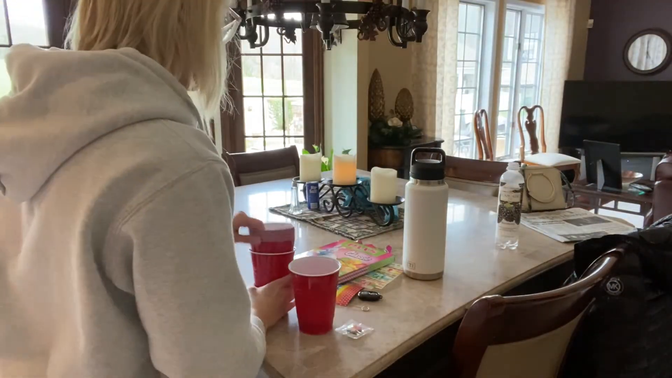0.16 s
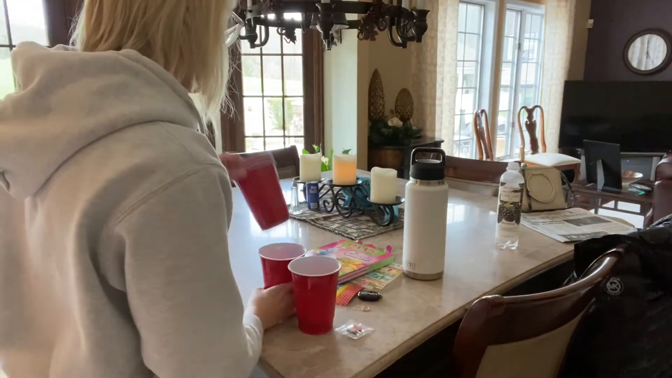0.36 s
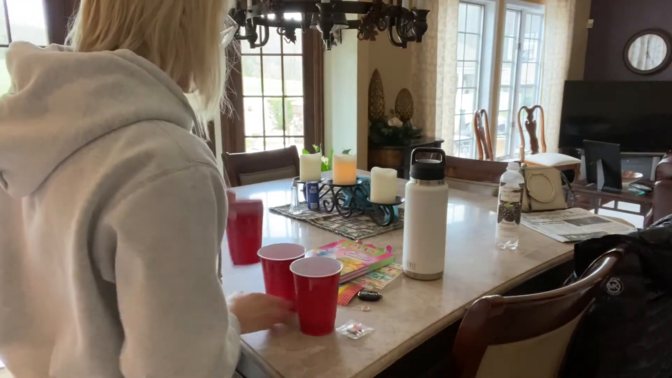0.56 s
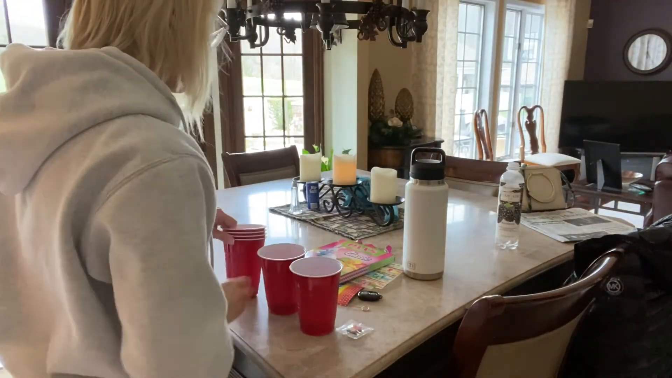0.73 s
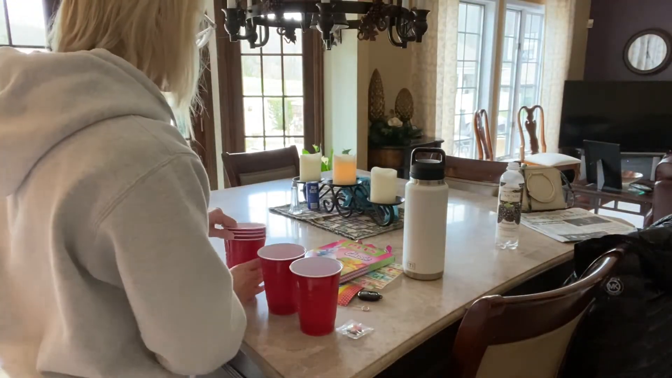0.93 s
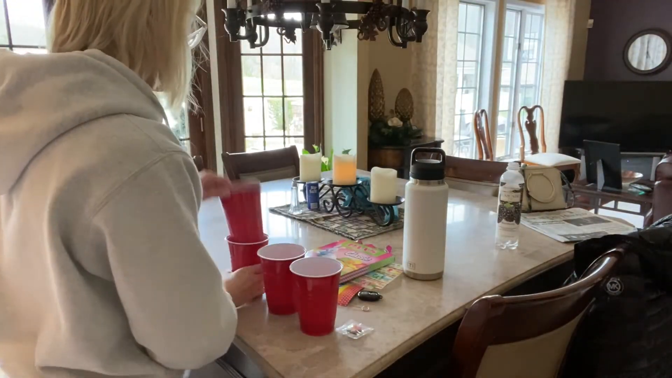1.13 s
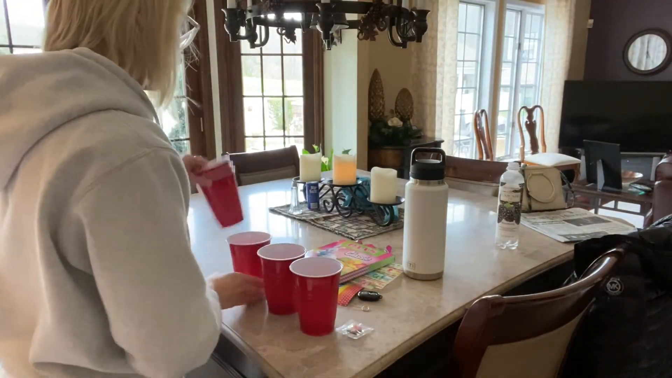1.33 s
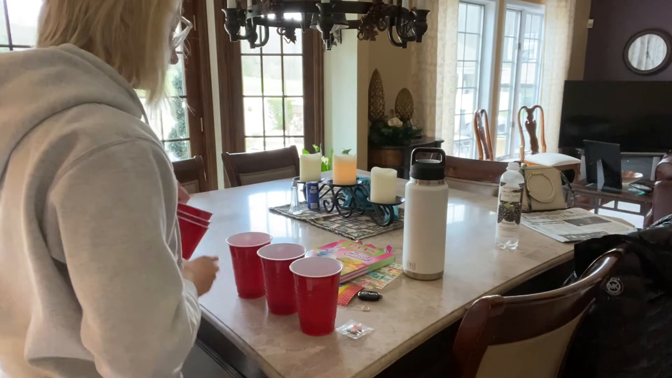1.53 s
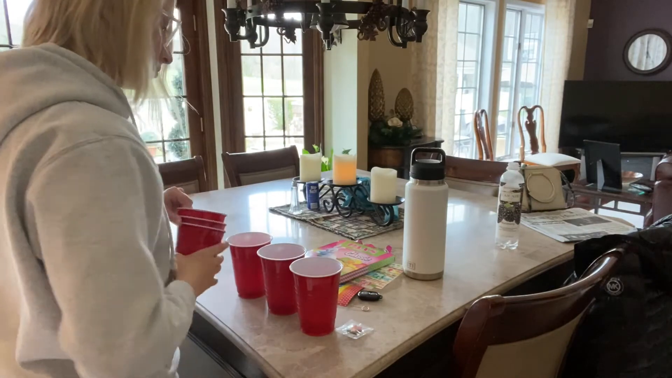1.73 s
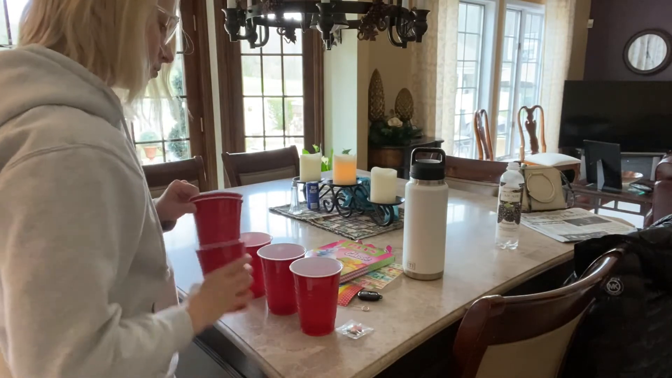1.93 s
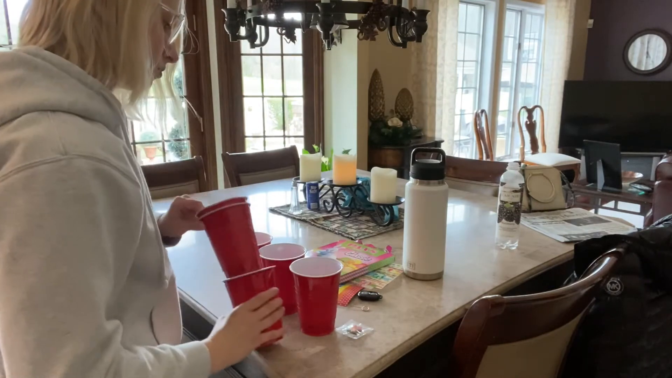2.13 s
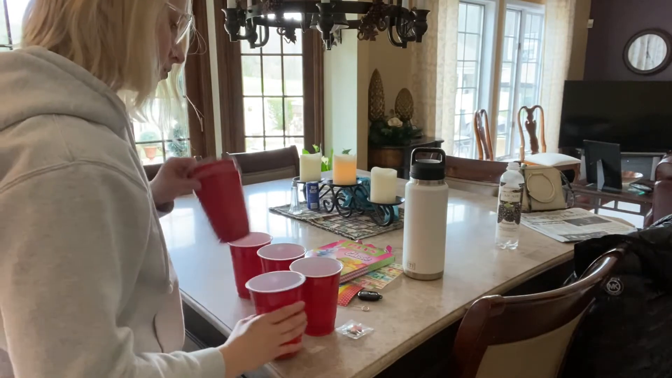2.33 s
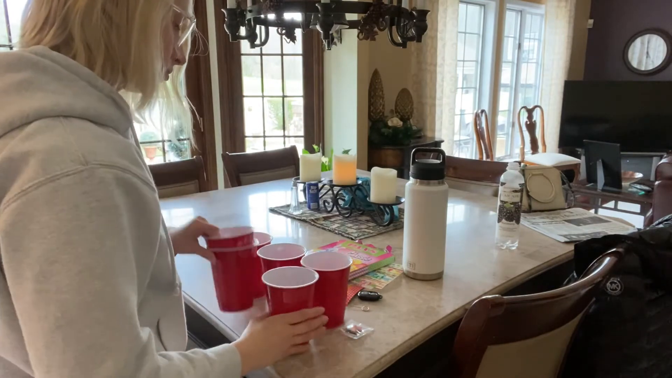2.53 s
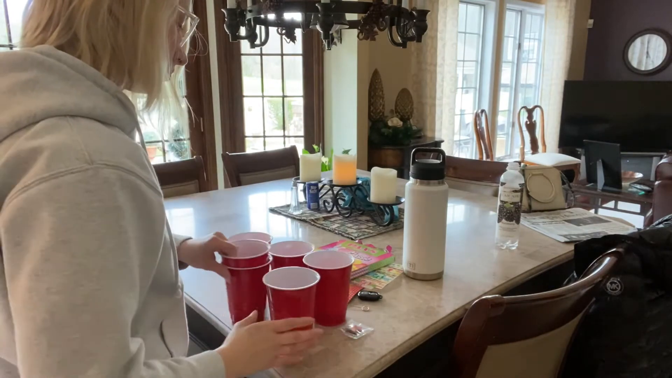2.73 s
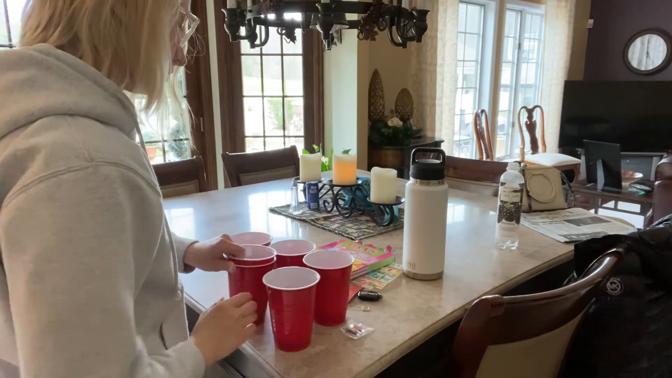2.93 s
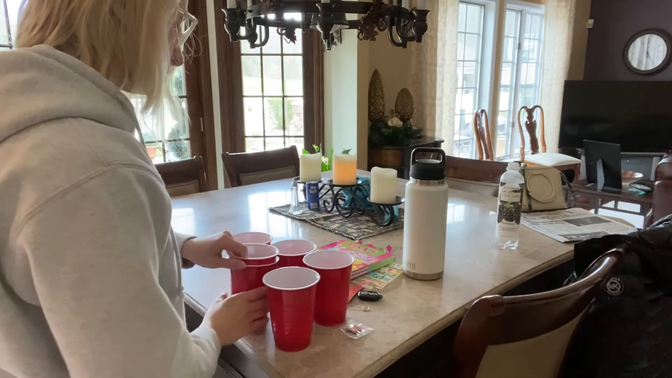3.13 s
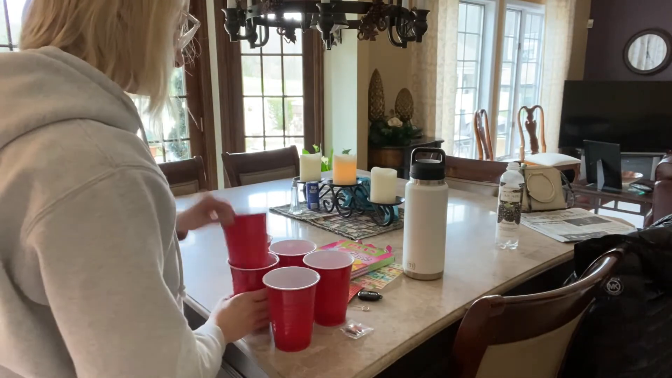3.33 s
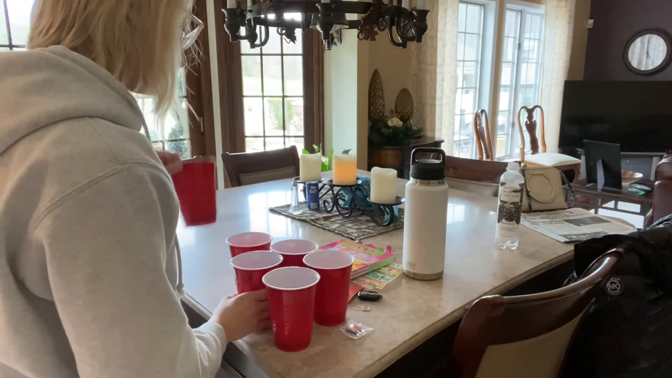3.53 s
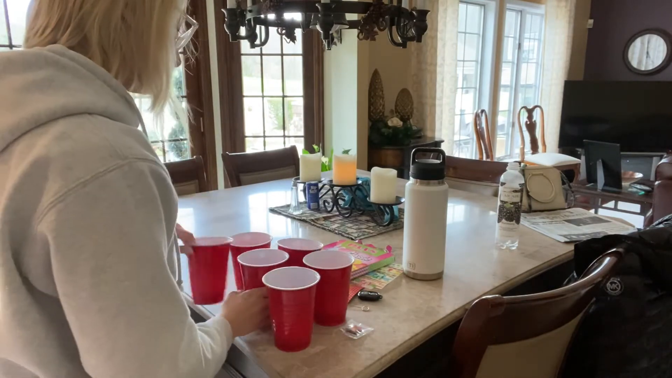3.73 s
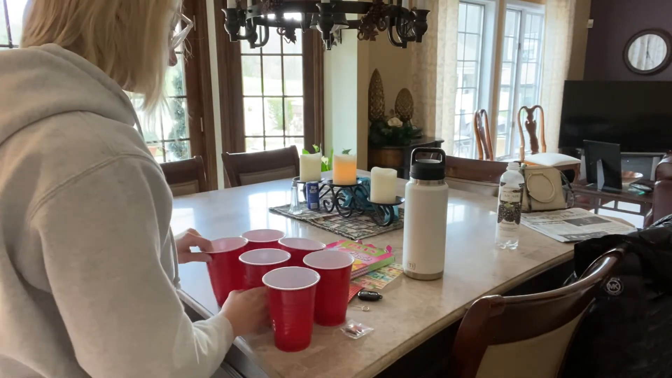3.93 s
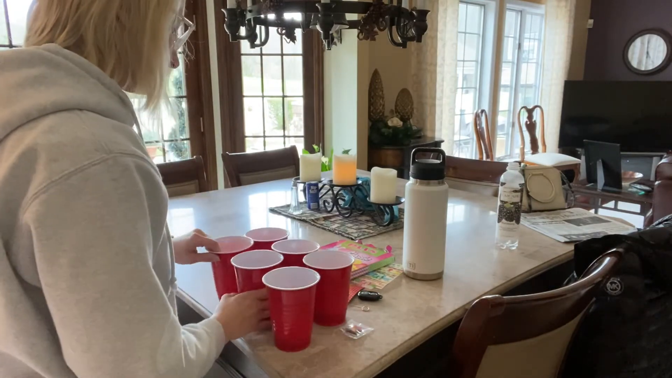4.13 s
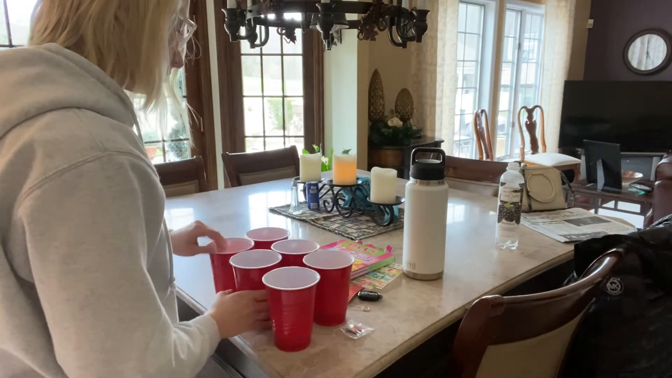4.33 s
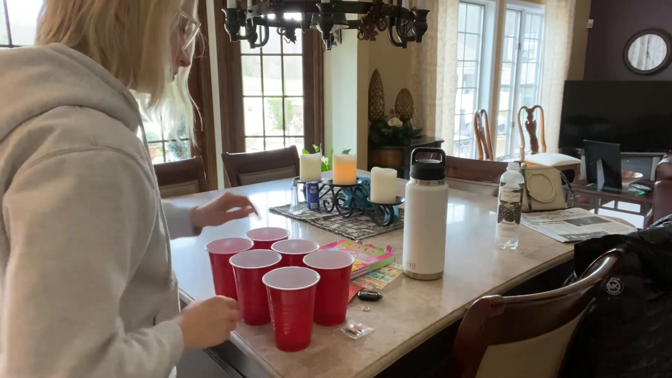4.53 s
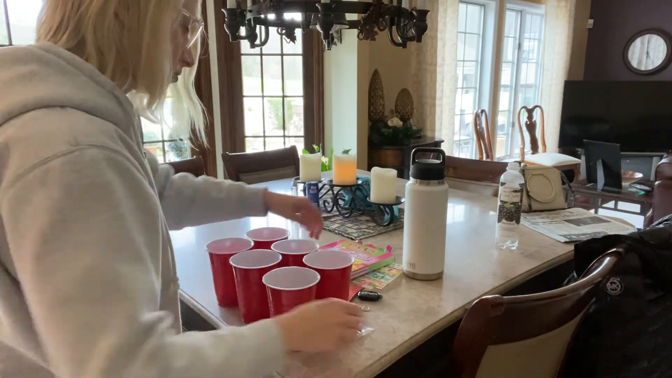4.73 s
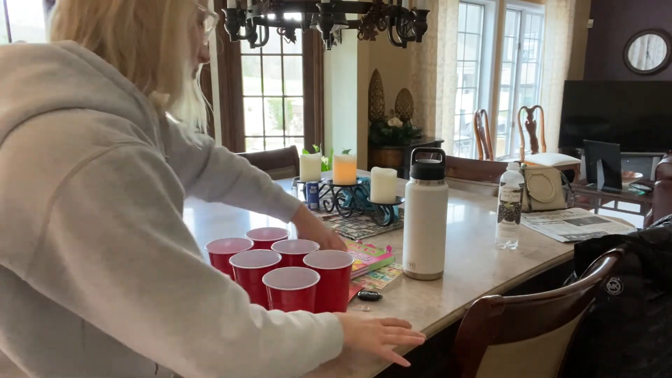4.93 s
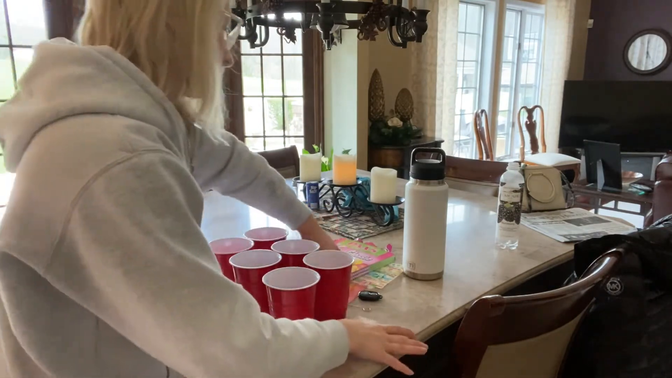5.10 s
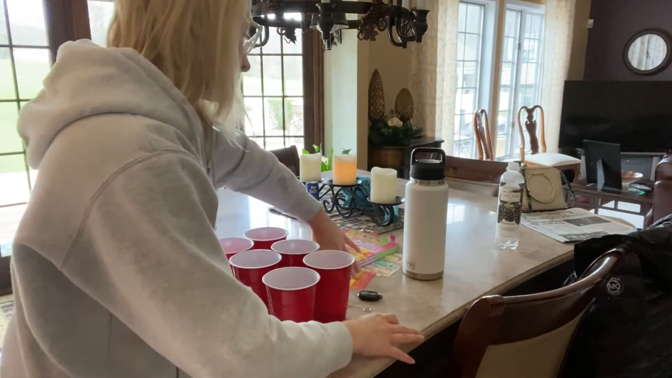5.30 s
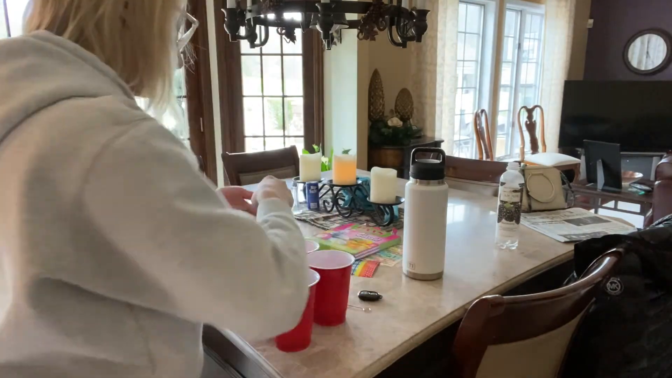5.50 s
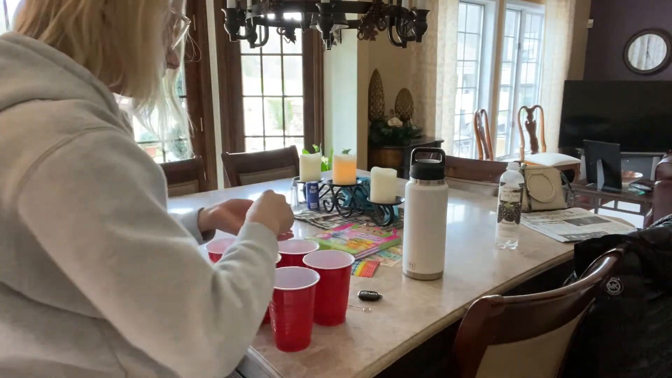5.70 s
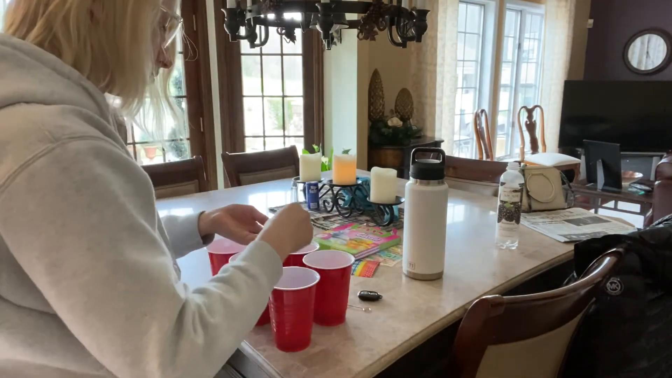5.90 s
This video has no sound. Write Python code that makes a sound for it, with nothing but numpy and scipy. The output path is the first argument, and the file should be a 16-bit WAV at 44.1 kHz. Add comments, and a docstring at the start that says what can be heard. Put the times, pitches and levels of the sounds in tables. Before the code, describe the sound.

Thin plastic cups are slid off a stack and knocked onto a stone counter with hollow pops, scrapes and rattles, then a palm sweep and click.

```python
"""Thin plastic cups on a stone counter

Thin plastic cups are pulled off a stack, set down and nudged together on a stone counter in a kitchen.
Each knock rings the air in the cup and its wall, as decaying sines and shaped noise bursts.
Sliding walls scrape: tiny random slips feed resonators, and narrow gliding notes hum along.
Later a palm sweeps over the stone as shaped slips, and something small clicks down as bursts of noise.
The room answers the knocks with fading noise bands, over a very quiet floor of hiss and dull rumbles.
"""
import sys
import numpy as np
from scipy import signal
from scipy.fft import rfft, irfft
from scipy.io import wavfile
from scipy.ndimage import uniform_filter1d

SR = 44100
rng = np.random.default_rng(int(sys.argv[2]) if len(sys.argv) > 2 else 0)


def wrap_up_sound(samples):
    """Save the sound to the file named by the first command line argument, as 16-bit audio."""
    columns = np.atleast_2d(samples).T
    # keep every value between -1 and 1, then stretch to whole-number steps
    tamed = np.clip(columns, -1, 1)
    steps = np.round(tamed * 32767).astype(np.int16)
    wavfile.write(sys.argv[1], SR, steps)


N = 262836
T = np.arange(N) / SR


def undb(db):
    """Turn decibels into a gain."""
    return 10 ** (np.asarray(db) / 20)


def unit(x):
    """Scale to an rms of 1."""
    return x / np.sqrt(np.mean(x ** 2))


def peak_unit(x):
    """Scale to a peak of 1."""
    return x / np.max(np.abs(x))


def onset_unit(x):
    """Scale to an rms of 1 over the first 20 ms."""
    return x / np.sqrt(np.mean(x[..., :SR // 50] ** 2))


def along(table, size):
    """Read a (pitch_hz, value) table at the bins of a transform, on a log pitch scale."""
    hz, value = np.transpose(table)[:2]
    bins_hz = np.arange(size // 2 + 1) * SR / size
    return np.interp(np.log(bins_hz + 1), np.log(hz), value)


def colour(x, table):
    """Shape the spectrum with (pitch_hz, level_db) points."""
    size = x.shape[-1]
    return irfft(rfft(x) * undb(along(table, size)), size)


def resonate(x, hz, width_hz):
    """Let one damped resonance answer a signal."""
    return signal.lfilter(*signal.iirpeak(hz, hz / width_hz, fs=SR), x)


def ring(t, hz, t60_s, rise_s):
    """Sound one struck mode: a sine with a soft start and an exponential decay."""
    decay = np.exp(-np.log(1000) * t / t60_s)
    return np.sin(2 * np.pi * hz * t) * decay * (1 - np.exp(-t / rise_s))


def curve(table):
    """Draw gains over time from the dB columns of a table; inaudible outside it."""
    s, *columns_db = np.transpose(table)
    return [undb(np.interp(T, s, db, left=-140, right=-140)) for db in columns_db]


def uneven(hold, smooth):
    """Draw a slow random curve: values held for some samples, then smoothed over others."""
    steps = np.repeat(rng.standard_normal(N // hold + 1), hold)
    return uniform_filter1d(steps, smooth)[:N]


def slips(rate_hz, spread_db):
    """Scatter stick-slip clicks of random height, sparse enough to be single samples."""
    when = rng.random((2, N)) < rate_hz / SR
    height = rng.standard_normal((2, N))
    boost_db = spread_db * np.minimum(rng.exponential(size=(2, N)), 4)
    return when * height * undb(boost_db)


# How alike left and right sound: pitch_hz, likeness (0-1)
STEREO_LIKENESS = [(30, .85), (60, .85), (130, .78), (300, .5), (600, .05), (1200, .3), (2500, .25),
                   (5000, .65), (8500, .85), (15000, .8)]


def wide(x):
    """Spread two unrelated signals into left and right, as alike as the table says at each pitch."""
    size = x.shape[-1]
    like = np.clip(along(STEREO_LIKENESS, size), 0, .99)
    mid = rfft(x[0]) * np.sqrt((1 + like) / 2)
    side = rfft(x[1]) * np.sqrt((1 - like) / 2)
    return irfft(np.array([mid + side, mid - side]), size)


# Spectrum of the quiet room hiss: pitch_hz, level_db (per Hz)
FLOOR_COLOUR = [(15, -35), (25, -18.5), (54, -10), (130, -4.5), (200, -23), (305, -18.5), (470, -17),
                (1000, -20.5), (2000, -24), (4500, -30), (8500, -27.5), (13000, -28.5), (14200, -55)]
# Thuds through the stand and the counter: time_s, stand_db, counter_db
RUMBLE_LEVELS = [(0.0, -58, -58), (0.31, -67, -55.5), (0.7, -70, -72.5), (0.78, -73, -55.5),
                 (0.93, -67.5, -60.5), (1.94, -74, -68), (2.14, -72, -48.5), (2.42, -72, -70),
                 (2.71, -90, -53), (3.17, -91, -67.5), (3.39, -94, -52), (3.72, -92, -69.5),
                 (3.95, -63, -59.5), (4.4, -76, -65), (4.98, -91, -86), (5.12, -63, -64),
                 (5.25, -52.5, -67), (5.43, -75, -80.5), (5.88, -59.5, -66.5), (5.96, -75, -72.5)]
FLOOR_DB = -73.5


def floor():
    """Quiet hiss of the room, and dull low noise that swells and sinks while the hands work."""
    stand_gain, counter_gain = curve(RUMBLE_LEVELS)
    # shapes: (pitch_hz, level_db)
    stand_colour = [(15, -44.0), (30, -21.0), (55, 9), (80, -6.5), (150, -50.5)]
    counter_colour = [(50, -42.5), (90, -3), (165, -2.5), (220, -2.0), (320, -8.0), (600, -69.0)]
    stand = colour(rng.standard_normal((2, N)), stand_colour)
    counter = colour(rng.standard_normal((2, N)), counter_colour)
    hiss = colour(rng.standard_normal((2, N)), FLOOR_COLOUR)
    return wide(undb(FLOOR_DB) * unit(hiss) + stand_gain * unit(stand) + counter_gain * unit(counter))


# Cup walls and fingers sliding: time_s, hollow_db, wall_db, rasp_db
SCRAPE_LEVELS = [(0.0, -51, -101, -115), (0.12, -70, -68, -62.5), (0.27, -43, -57, -51),
                 (0.39, -46, -85, -62), (0.53, -69.5, -83, -68), (0.59, -85, -63, -58.5),
                 (0.68, -70, -88, -81), (0.755, -56.5, -65, -89), (0.8, -44.5, -74, -102),
                 (0.96, -55.5, -64, -57), (1.24, -52, -54, -70), (1.4, -55, -66, -102),
                 (1.6, -58.5, -60.5, -68), (1.82, -61, -68, -62.5), (1.88, -49.5, -56, -46.5),
                 (1.97, -48.5, -55, -50.5), (2.05, -45, -55.5, -55), (2.22, -48, -68, -77),
                 (2.43, -50, -83, -60.5), (2.66, -58, -42, -58), (2.88, -71, -53, -66),
                 (3.0, -57, -70, -72), (3.13, -55, -73, -66), (3.37, -46, -58.5, -46),
                 (3.56, -58, -76.5, -71), (3.65, -62, -75, -94), (3.77, -70, -81, -72),
                 (3.87, -44.5, -82, -66), (4.0, -42.5, -73, -80), (4.07, -45.5, -73, -69),
                 (4.25, -54.5, -69, -77), (4.37, -58, -61, -83), (4.42, -66.5, -96, -79),
                 (4.45, -87.5, -100, -96)]
# Air in the cups: pitch_hz, width_hz, level_db
HOLLOW_MODES = [(313, 90, -6.5), (394, 90, 8.5), (715, 47, 12.5)]
# Modes of the cup wall, also struck by knocks: pitch_hz, level_db, t60_s
WALL_MODES = [(1219, 1, 0.055), (1440, 5, 0.029), (1843, 13.5, 0.024), (2079, 7, 0.045), (2360, 3, 0.051),
              (2360, -7, 0.011), (3200, -7.5, 0.11), (5060, -11.5, 0.031)]
# Small high modes of the rim, also struck by knocks: pitch_hz, level_db, t60_s
RIM_PINGS = [(3062, -1.5, 0.048), (3580, -2.5, 0.039), (4450, 2.5, .03), (4880, 2.5, 0.036),
             (5300, 0, 0.039), (5720, -4.5, 0.033), (7430, -6.5, 0.033)]
# Hard bright crack, also in knocks: pitch_hz, level_db (per Hz)
TICK_COLOUR = [(700, -18.5), (1200, -13), (2500, -15.5), (3500, 7), (5000, 7.5), (6300, -8), (7500, -26),
               (9000, -30.5)]
# Highest crackle, also in knocks: pitch_hz, level_db (per Hz)
SIZZLE_COLOUR = [(5000, -28), (6500, -4), (7500, -5), (10000, -11), (13000, -8.5), (16000, -8.5)]


def scrape():
    """Slips of wall on wall, in uneven bunches, feed the air in the cups, the wall modes and a rasp."""
    hollow_gain, wall_gain, rasp_gain = curve(SCRAPE_LEVELS)
    grip_db = 1.5 * uneven(300, 150)
    x = slips(4000, 0.71) * undb(grip_db)
    air = sum(undb(db) * resonate(x, hz, width) for hz, width, db in HOLLOW_MODES)
    # a shorter t60 makes a wider resonance
    wall = sum(undb(db) * resonate(x, hz, 9.8 / t60) for hz, db, t60 in WALL_MODES)
    rim = sum(undb(db) * resonate(x, hz, 5.1 / t60) for hz, db, t60 in RIM_PINGS)
    rasp = unit(colour(x, TICK_COLOUR)) + .6 * unit(rim) + 1.8 * unit(colour(x, SIZZLE_COLOUR))
    return wide(hollow_gain * unit(air) + wall_gain * unit(wall) + rasp_gain * unit(rasp))


# Knocks: start_s, air_peak_db, air_hz, thud_db, wall_hz, wall_db, tick_db, sizzle_db,
# left_minus_right_db, rattle_db (against the blow), air_swell_s
KNOCK_LIST = [(0.015, -42, 343, -47.5, 1540, -93, -91, -79, 0, -11, 0.0047),
              (0.101, -76, 294, -51.5, 1590, -72.5, -70, -58, -3, 5.5, 0.0031),
              (0.128, -81, 293, -80, 1930, -73, -65, -58.5, 0, -23, 0.0035),
              (0.179, -56, 400, -69, 1600, -72, -68.5, -62, -2, 10.5, 0.0031),
              (0.204, -15, 416, -35.5, 1470, -46, -55, -54, -2.5, -8.5, 0.0025),
              (0.251, -29.5, 381, -39, 1400, -55, -64, -70, -4, 0.5, 0.0056),
              (0.287, -35.5, 412, -50, 2280, -45.5, -50, -50, -2, -24, 0.009),
              (0.318, -31, 614, -62, 2570, -83, -55, -56, -2, -10, 0.0057),
              (0.361, -48, 402, -65, 1480, -49.5, -57, -48.5, 2, -23, 0.0027),
              (0.368, -43.5, 297, -56, 2090, -41, -45, -62, -4.5, -25, 0.012),
              (0.447, -45, 362, -72, 1950, -51.5, -70, -61, -2, -20, 0.0033),
              (0.546, -57, 460, -79, 1717, -57.5, -74, -68, -2, 2.5, 0.003),
              (0.577, -61, 310, -82, 1580, -60, -62.5, -73, 0, -12, 0.0044),
              (0.767, -22, 446, -34.5, 1790, -46, -49, -55, -2, -7.5, 0.0034),
              (0.934, -61.5, 325, -71, 1730, -76, -72, -72, 7, -22, 0.0052),
              (1.016, -47, 444, -76, 1900, -68, -65, -51, -2, 11, 0.003),
              (1.046, -31, 437, -55, 1160, -35.5, -51, -48, 0, -3, 0.0075),
              (1.059, -30.5, 475, -56, 1645, -34, -46, -56, -3, -23, 0.0079),
              (1.077, -25, 426, -73, 1500, -44, -59, -58, -4, -1.5, 0.0032),
              (1.111, -32, 490, -68, 1440, -59, -52, -51.5, 0.5, -3.5, 0.007),
              (1.173, -31, 452, -64, 1465, -39.5, -60, -88, -2, -18, 0.004),
              (1.211, -25.5, 817, -57, 1770, -32, -42.5, -62, -1, -22, 0.0055),
              (1.243, -30.5, 618, -69, 1810, -52.5, -54, -73, -1, -13.5, 0.0022),
              (1.317, -42, 700, -70.5, 2080, -63, -67, -79, 4, -13.5, 0.0056),
              (1.343, -41.5, 660, -67, 2070, -64.5, -73, -77.5, 9, -16, 0.0045),
              (1.422, -38.5, 635, -65.5, 2090, -56.5, -66, -76, 2, -7.5, 0.0039),
              (1.487, -43, 680, -65, 2140, -58, -60, -63, 0, -3, 0.003),
              (1.509, -42, 358, -55.5, 1640, -58, -64.5, -54, -1, -5, 0.0033),
              (1.565, -53, 693, -66, 2120, -73.5, -71, -68, -1, -20, 0.0034),
              (1.612, -53, 626, -66, 2140, -56.5, -61, -79, 1, -10, 0.00096),
              (1.641, -56.5, 780, -63.5, 2060, -61, -62.5, -51.5, -1, -3, 0.012),
              (1.776, -54, 703, -76, 1450, -63, -72, -68, -3, -13, 0.0092),
              (1.79, -58, 756, -72.5, 2370, -66, -66, -66, -5, -15, 0.0044),
              (1.857, -42.5, 413, -60.5, 1840, -58.5, -63.5, -59, -3, 3, 0.0025),
              (1.896, -36.5, 769, -61.5, 1914, -44, -55, -58.5, -1.5, -9, 0.009),
              (1.949, -49.5, 706, -68.5, 2170, -54, -54.5, -67, 0, -11, 0.0013),
              (2.01, -38, 554, -59.5, 1730, -58, -48, -60, 4, -14, 0.0059),
              (2.029, -39.5, 533, -55.5, 1800, -50, -45.5, -44.5, -2.5, -12, 0.0058),
              (2.067, -39, 585, -58, 2200, -47, -45, -51, -1, -12.5, 0.0058),
              (2.086, -42.5, 595, -58.5, 2200, -58.5, -57, -54.5, -1, -16.5, 0.0033),
              (2.1, -12.5, 629, -37, 1827, -28, -32.5, -43.5, 0, -30, 0.0045),
              (2.119, -30, 470, -37.5, 2250, -54, -55, -48.5, -3, -17, 0.0016),
              (2.172, -23.5, 600, -56, 1850, -71, -52.5, -60, 8, -22.5, 0.0027),
              (2.187, -24, 662, -59, 2220, -63.5, -53, -57, -3, -15.5, 0.0029),
              (2.199, -28.5, 518, -53.5, 1894, -35, -42, -46.5, 0, -34, 0.0044),
              (2.246, -31.5, 537, -57, 2000, -72, -59, -73, 1, -4, 0.0036),
              (2.341, -29, 644, -61.5, 2300, -59.5, -74.5, -81.5, 3, -28, 0.0036),
              (2.387, -34.5, 635, -79, 2320, -38, -48, -49, 0, -10.5, 0.011),
              (2.413, -44, 676, -64, 2126, -44, -51.5, -49.5, -1, -16, 0.00085),
              (2.457, -52.5, 647, -60, 1400, -60, -64.5, -59, -0.5, -17, 0.0035),
              (2.477, -36, 673, -56.5, 2440, -50, -55.5, -59, -2, -9, 0.0053),
              (2.498, -43, 646, -62, 2180, -45.5, -51, -47.5, 0, -5, 0.0024),
              (2.54, -38, 650, -58, 2280, -53, -52.5, -51, -2, -5, 0.0084),
              (2.611, -58, 650, -68.5, 1820, -54.5, -58, -57.5, -3, -16.5, 0.0035),
              (2.659, -21, 452, -44, 1990, -31, -35, -36.5, -1.5, -12, 0.008),
              (2.708, -18, 777, -33.5, 2313, -32, -57.5, -50, 3, -19.5, 0.006),
              (2.722, -33.5, 403, -42, 2434, -36, -47.5, -44, -2, -23.5, 0.0094),
              (2.75, -33, 396, -42.5, 2060, -55.5, -49, -58, -2, -6.5, 0.0045),
              (3.02, -48.5, 457, -63, 2000, -60.5, -57, -57, -1, -9.5, 0.0031),
              (3.076, -45, 457, -70, 1930, -54, -57, -58, -1, -11, 0.0064),
              (3.193, -44, 425, -59, 1920, -55, -55, -49, -2.5, -0.5, 0.004),
              (3.222, -28.5, 451, -55.5, 2360, -42, -47.5, -62, -4.5, -20, 0.0058),
              (3.225, -28.5, 754, -58.5, 2180, -65.5, -64, -60, -1.5, -1, 0.0031),
              (3.234, -28.5, 728, -62, 2130, -48, -49, -44, 0, -5.5, 0.0076),
              (3.292, -40.5, 750, -64.5, 2160, -51, -55.5, -51.5, -2, -1, 0.0058),
              (3.32, -37, 452, -60, 2235, -41, -49, -44, -1, -3.5, 0.0065),
              (3.338, -9.5, 456, -43.5, 1933, -36.5, -46.5, -42.5, -5, -14, 0.0085),
              (3.357, -28.5, 540, -45.5, 1660, -50, -37.5, -37.5, -0.5, -17.5, 0.0064),
              (3.367, -34.5, 487, -63.5, 2080, -42, -39, -51.5, 2, -18.5, 0.0027),
              (3.4, -33, 480, -40, 2050, -61, -74, -63, -0.5, -14, 0.0021),
              (3.456, -43.5, 470, -68, 2240, -60, -58, -60.5, 0, -21, 0.0018),
              (3.616, -67, 483, -72, 2070, -54, -59.5, -61, -2, -5.5, 0.0049),
              (3.645, -51, 450, -63, 2160, -55, -60, -59.5, -1, -8, 0.0079),
              (3.668, -57, 460, -64, 2260, -56.5, -69, -75, 4, -24, 0.0032),
              (3.791, -50, 800, -70, 2120, -66, -65, -58, 0, 0, 0.0021),
              (3.802, -46.5, 884, -66, 1820, -54, -54, -53.5, -2, -11, 0.012),
              (3.877, -30.5, 651, -71, 1970, -43.5, -51, -55, -0.5, -6, 0.014),
              (3.935, -24, 635, -55, 2190, -45.5, -48.5, -55.5, -1.5, -4.5, 0.0062),
              (3.949, -28, 648, -69, 1790, -47, -65, -69, 0, -5, 0.009),
              (3.974, -28.5, 636, -60, 1750, -56, -66.5, -70, 0, -8, 0.003),
              (3.987, -26, 634, -48.5, 1700, -48.5, -65, -74, 0, 1, 0.0021),
              (4.028, -32, 612, -48, 2110, -46, -63, -75, 0.5, -8, 0.0059),
              (4.087, -46.5, 653, -65, 2310, -44.5, -51.5, -55.5, -1, -18, 0.0022),
              (4.119, -39, 597, -62, 2030, -46, -49.5, -58, 0, -8, 0.0016),
              (4.172, -42.5, 643, -76, 2270, -50, -58, -63, -3, -9.5, 0.0061),
              (4.193, -60, 680, -73, 1960, -51, -58, -60, 0.5, -4, 0.0046),
              (4.218, -49, 502, -75, 2170, -52, -63.5, -58, -1, -9, 0.0037),
              (4.267, -42.5, 623, -57, 1720, -64, -62, -70, -3, -10, 0.0088),
              (4.348, -47.5, 663, -60, 1880, -64, -77.5, -65, 1, -11, 0.0043),
              (5.019, -85, 628, -89, 1700, -79, -67, -59, -4, -9.5, 0.0031),
              (5.032, -85, 632, -88, 1720, -67, -70, -57, -2, -5, 0.0032),
              (5.073, -66, 700, -86, 950, -50.5, -59, -58, -4, -7, 0.0033)]
# Dense small modes of the wall: pitch_hz, level_db (per Hz)
SLAP_COLOUR = [(350, -28), (650, 7), (1200, -6.5), (2200, -10), (3200, -7.5), (4500, -38.5)]
# Notes of the rim as the cup trembles: pitch_hz, width_hz, level_db
RATTLE_RIM = [(2140, 320, -7), (2840, 290, -21), (5340, 120, -20.5)]
RATTLE_S = 0.032  # decay of the trembling
PING_DB = 1  # against the tick
ROOM_DB = -4.5  # share of a knock sent to the room


def struck(modes, t, luck_db, luck_pitch, rise_s):
    """Strike a set of modes, each a little off in level (dB) and pitch (share) at every blow."""
    luck = rng.standard_normal((len(modes), 2)) * [luck_db, luck_pitch]
    return sum(undb(db + more_db) * ring(t, hz * (1 + shift), t60, rise_s)
               for (hz, db, t60), (more_db, shift) in zip(modes, luck))


def cup_air(t, hz, swell_s):
    """Squeezed air swells for a few cycles, spills out fast and leaves a weak ring."""
    puff = t / swell_s * np.exp(-(t / swell_s) ** 2 / 2)
    air = puff * (np.sin(2 * np.pi * hz * t) + 0.083 * np.sin(2.8 * np.pi * hz * t))
    return air + .2 * ring(t, hz, .07, .003) + .15 * ring(t, .8 * hz, .06, .003)


def cup_wall(t, wall_hz):
    """Wall modes struck anew, with a close pair of notes favoured by the place struck."""
    pair = ring(t, wall_hz, 0.061, 0.0016) + 0.4 * ring(t, 0.92 * wall_hz, 0.079, 0.0015)
    return struck(WALL_MODES, t, 3, .03, 0.01) + 1.5 * pair


def rim_burst(t, jolts):
    """The rim chatters on the stone: a sharp noise burst and an uneven tail, spread left and right."""
    fade = np.exp(-t / 0.0037) + 0.21 * jolts * np.exp(-t / 0.022)
    return wide(rng.standard_normal((2, len(t)))) * fade * (1 - np.exp(-t / .001))


def rattle(t, jolts, air_hz, wall_hz, air_gain, wall_gain, tick_gain):
    """The cup trembles on: its air, favoured wall note and rim answer a fading, uneven push."""
    fade = jolts * np.exp(-t / RATTLE_S) * (1 - np.exp(-t / 0.0062))
    push = wide(rng.standard_normal((2, len(t)))) * fade
    air = resonate(push, air_hz, 60) + .6 * resonate(push, 1.184 * air_hz, 57)
    notes = 0.89 * onset_unit(resonate(push, wall_hz, 200))
    notes = notes + sum(undb(db) * onset_unit(resonate(push, hz, width)) for hz, width, db in RATTLE_RIM)
    tick = onset_unit(colour(push, TICK_COLOUR))
    return air_gain * peak_unit(air) + wall_gain * notes + tick_gain * tick


def knocks():
    """Air note, dull thud of the base, struck wall, bright crack and rattle; rows left, right, room."""
    out, t = np.zeros((3, N + SR)), np.arange(8192) / SR
    thud = ring(t, 298.0, 0.061, 0.0033) + .5 * ring(t, 181.8, 0.11, 0.0039)
    thud = thud + 1.2 * ring(t, 590, 0.02, 0.00086)
    end_fade = np.clip((t[-1] - t) / .04, 0, 1)
    for (s, air_db, air_hz, thud_db, wall_hz, wall_db, tick_db, sizzle_db,
         pan_db, rattle_db, swell_s) in KNOCK_LIST:
        air_gain, wall_gain, tick_gain = undb(air_db), undb(wall_db), undb(tick_db)
        jolts = np.repeat(undb(6 * rng.standard_normal(len(t) // 64)), 64)
        burst = rim_burst(t, jolts)
        wall = peak_unit(cup_wall(t, wall_hz)) + 1.8 * peak_unit(colour(burst, SLAP_COLOUR))
        ping = struck(RIM_PINGS, t, 6, .025, .0006)
        tick = onset_unit(colour(burst, TICK_COLOUR)) + undb(PING_DB) * onset_unit(ping)
        hit = air_gain * peak_unit(cup_air(t, air_hz, swell_s)) + undb(thud_db) * onset_unit(thud)
        hit = hit + wall_gain * onset_unit(wall) + tick_gain * onset_unit(tick)
        hit = hit + undb(sizzle_db) * onset_unit(colour(burst, SIZZLE_COLOUR))
        trembling = rattle(t, jolts, air_hz, wall_hz, air_gain, wall_gain, tick_gain)
        hit = (hit + undb(rattle_db) * trembling) * end_fade
        sends = undb(np.array([[pan_db / 2], [-pan_db / 2], [ROOM_DB]]))
        i = int(s * SR)
        out[:, i:i + len(t)] += sends * hit[[0, 1, 0]]  # the room takes the left row
    return out[:, :N]


# Reverberation of the kitchen in bands: pitch_hz, t60_s, level_db
ROOM_BANDS = [(150, 0.21, 1), (318, 0.46, 2.5), (700, 0.46, -5.5), (1220, 0.073, 1), (2360, 0.62, -5),
              (3630, 0.087, -9), (7900, 0.079, -0.5), (11000, 0.056, 0)]


def room(x):
    """Noise bands die away, each at its own pace, fading in after a gap of 4 ms."""
    t, tail = np.arange(32768) / SR, 0
    for hz, t60_s, db in ROOM_BANDS:
        band = resonate(resonate(rng.standard_normal((2, len(t))), hz, hz), hz, hz)
        band = band * np.exp(-np.log(1000) * t / t60_s)
        energy = np.sum(band ** 2) / 2
        tail = tail + undb(db) * band / np.sqrt(energy) * np.sqrt(hz / 10000)
    tail = wide(tail) * np.clip((t - .004) / .015, 0, 1)
    return signal.fftconvolve(x, tail, axes=1)[:, :N]


# One note of a cup humming on while it slides or wobbles:
# start_s, length_s, first_hz, last_hz, width_hz, level_db (at its start)
HUM_LIST = [(0.078, 0.073, 755, 800, 120, -58), (0.195, 0.042, 1412, 1380, 100, -40.5),
            (0.385, 0.075, 2150, 2160, 40, -50.5), (0.46, 0.09, 2150, 2100, 50, -60),
            (0.4, 0.084, 5370, 5300, 70, -59), (0.537, 0.062, 1607, 1750, 398, -58),
            (0.712, 0.044, 3400, 3550, 150, -69), (0.766, 0.029, 1133, 1160, 120, -45),
            (0.767, 0.027, 3350, 3320, 150, -46), (0.776, 0.08, 1780, 1780, 60, -67),
            (1.047, 0.1, 815, 740, 120, -38.5), (1.066, 0.11, 304, 315, 29.5, -41),
            (1.206, 0.022, 594, 600, 60, -29), (1.257, 0.086, 2073, 2055, 58.7, -51.5),
            (1.302, 0.068, 783, 662, 50, -50), (1.425, 0.07, 1150, 1130, 21, -59),
            (1.444, 0.16, 690, 697, 55, -58), (1.52, 0.16, 167, 165, 26, -58.5),
            (1.622, 0.13, 724, 657, 80, -56), (1.783, 0.067, 760, 770, 53, -57),
            (1.853, 0.09, 1790, 2100, 300, -53.5), (1.902, 0.099, 431, 396, 59.7, -45),
            (2.101, 0.12, 1197, 1160, 69, -52), (2.108, 0.053, 478, 510, 39.78, -25),
            (2.11, 0.017, 720, 720, 60, -36.5), (2.342, 0.03, 886, 1450, 210, -47),
            (2.41, 0.087, 3160, 3130, 63, -51.5), (2.49, 0.11, 943, 943, 42, -49.5),
            (2.607, 0.039, 1750, 2020, 118.5, -47.5), (2.649, 0.05, 713, 720, 100.7, -39.5),
            (2.706, 0.13, 419.2, 398.5, 60, -40), (2.722, 0.16, 204.2, 174, 62, -49.5),
            (2.763, 0.16, 770, 766, 51, -42.5), (3.082, 0.059, 721, 702, 50.1, -45),
            (3.09, 0.049, 2130, 2120, 120, -60), (3.211, 0.048, 916, 930, 60, -48.5),
            (3.34, 0.072, 1200, 1180, 60, -43.5), (3.347, 0.18, 760, 780, 90, -45.5),
            (3.359, 0.068, 504, 455, 30, -38.5), (3.368, 0.057, 2060, 2080, 80.5, -53),
            (3.445, 0.045, 440, 410, 60, -43), (3.5, 0.037, 466, 450, 40, -44),
            (3.878, 0.028, 3080, 3060, 90, -51), (3.88, 0.03, 1710, 1720, 80, -49),
            (3.934, 0.024, 2970, 3080, 90, -44), (3.99, 0.028, 3050, 3040, 90, -45),
            (4.03, 0.014, 2100, 2080, 90, -50), (3.958, 0.083, 1750, 1650, 80, -49),
            (4.03, 0.052, 1100, 1150, 34, -49), (4.089, 0.18, 2090, 2080, 57, -51.5),
            (4.253, 0.052, 674, 640, 60, -48), (4.282, 0.02, 302, 300, 100, -53),
            (4.312, 0.054, 691, 680, 86.5, -50), (4.339, 0.1, 2140, 2030, 120, -62.5),
            (4.395, 0.048, 683, 660, 80, -58.5), (5.07, 0.11, 3260, 2790, 297, -61),
            (5.252, 0.12, 2905, 3280, 300, -54.5), (5.265, 0.12, 1930, 1250, 150, -56.5),
            (5.331, 0.11, 2290, 1300, 149.4, -62), (5.455, 0.073, 3210, 4090, 200, -61)]
HUM_EDGE_S, HUM_FADE_DB = .01, -5  # ramp at both ends; change of level over its length


def hums():
    """A narrow note that glides a little, its strength and phase shaken by the rubbing."""
    out = np.zeros((2, N))
    for s, length_s, first_hz, last_hz, width_hz, db in HUM_LIST:
        t = np.arange(int(length_s * SR)) / SR
        shake = rng.standard_normal((2, 2, SR // 4))
        pole = np.exp(-np.pi * width_hz / SR)
        # run the shaking in beforehand and keep its end
        shake = signal.lfilter([1], [1, -pole], shake[0] + 1j * shake[1])[:, -len(t):]
        evened = shake / np.abs(shake) ** 0.39
        cycles = (first_hz + (last_hz - first_hz) * t / length_s / 2) * t
        note = np.real(evened * np.exp(2j * np.pi * cycles))
        edges = np.clip(np.minimum(t, length_s - t) / HUM_EDGE_S, 0, 1)
        i = int(s * SR)
        out[:, i:i + len(t)] += undb(db + HUM_FADE_DB * t / length_s) * unit(note) * edges
    return wide(out)


# Palm over the stone: time_s, hiss_db, grit_db
SWEEP_LEVELS = [(4.97, -71, -94.5), (5.01, -70.5, -67), (5.04, -64, -53), (5.062, -65, -54.5),
                (5.094, -70, -45), (5.136, -58, -50), (5.244, -47, -50), (5.368, -54.5, -53.5),
                (5.406, -58.5, -56.5), (5.47, -53, -61), (5.524, -55.5, -59.5), (5.552, -101, -101),
                (5.57, -99, -99)]
# Fine hiss of the skin: pitch_hz, level_db (per Hz)
PALM_COLOUR = [(3500, -24.5), (5000, -4.5), (6400, -4), (8500, 1.5), (12000, -3), (13600, 7), (14200, -28)]
# Coarser grit: pitch_hz, level_db (per Hz)
GRIT_COLOUR = [(600, -20.5), (1000, -7.5), (1900, -5.5), (3000, -5.5), (4500, -10.5), (6500, -17)]
DRAG_S, DRAG_DB, DRAG_RISE_S, DRAG_FALL_S = 5.1, -41, 0.014, 0.048  # the cups are stirred once


def sweep():
    """Skin on polished stone: fine hiss, coarser grit, and a short drag that stirs the cups."""
    hiss_gain, grit_gain = curve(SWEEP_LEVELS)
    since_peak = np.where(T < DRAG_S, (DRAG_S - T) / DRAG_RISE_S, (T - DRAG_S) / DRAG_FALL_S)
    drag_gain = undb(DRAG_DB) * np.exp(-since_peak)
    grit_gain = grit_gain * undb(.8 * uneven(600, 400))  # uneven pressure
    x = slips(9000, 0.55)
    # stirred notes: (pitch_hz, width_hz, level_db)
    notes = [(299, 18, -3), (513, 12.4, 6.5), (690, 54, -1.5), (920, 120, -12.0)]
    stir = sum(undb(db) * resonate(rng.standard_normal((2, N)), hz, width) for hz, width, db in notes)
    hiss, grit = unit(colour(x, PALM_COLOUR)), unit(colour(x, GRIT_COLOUR))
    return wide(hiss_gain * hiss + grit_gain * grit + drag_gain * unit(stir))


# The small thing put down, and its bounces: start_s, level_db
CLICK_BLOWS = [(5.807, -28.5), (5.812, -53), (5.826, -42), (5.836, -39.5)]
# Spectrum of its front: pitch_hz, level_db (per Hz)
CLICK_FRONT = [(500, -59.5), (800, -29), (1050, 0.5), (2200, -1), (4000, -10), (9000, -2.5), (14000, -13)]
# Spectrum of its tail: pitch_hz, level_db (per Hz)
CLICK_TAIL = [(700, -19), (1200, -3), (3000, -4), (5500, 2), (10000, -9), (14000, -26)]
CLICK_FALL_S, CLICK_HISS_DB, CLICK_HISS_S = 0.0019, -43.5, 0.064  # front decay; tail level and decay


def click():
    """Hard dry fronts and a fading hiss, both from shaped noise."""
    def fade(start_s, fall_s):
        return (T >= start_s) * np.exp(-np.maximum(T - start_s, 0) / fall_s)

    def shaped(x, gain, table):
        # level set by the steady noise, before the fade
        return colour(x * gain, table) / np.std(colour(x, table))

    noise = rng.standard_normal((2, 2, N))
    blows = sum(undb(db) * fade(s, CLICK_FALL_S) for s, db in CLICK_BLOWS)
    hiss = undb(CLICK_HISS_DB) * fade(CLICK_BLOWS[0][0], CLICK_HISS_S)
    return wide(shaped(noise[0], blows, CLICK_FRONT) + shaped(noise[1], hiss, CLICK_TAIL))


# Balance of left against right by pitch, for all but the direct knocks; negative is quieter on the left:
# pitch_hz, left_minus_right_db
BALANCE = [(60, -0.5), (130, 0), (330, -2), (650, -3), (2500, 0.3), (8000, -0.4)]


def scene():
    """Direct knocks, plus everything else balanced left against right by pitch."""
    hits = signal.lfilter(*signal.butter(2, 90, "high", fs=SR), knocks())
    lean = undb(along(BALANCE, N) / 2)
    spread = rfft(floor() + scrape() + room(hits[2:]) + hums() + sweep() + click())
    return hits[:2] + irfft(spread * np.array([lean, 1 / lean]), N)


# Overall tone, dull above about 13 kHz: pitch_hz, level_db
OVERALL_TONE = [(20, -3), (13200, -6.5), (14300, -20), (22000, -17)]
# Phase of left ahead of right: pitch_hz, phase_rad
TREBLE_PHASE = [(20, 0), (10200, 0), (13600, 3.0), (22000, 3.2)]
TOP_HZ = 16200


def record(dry):
    """Dull the top, turn left and right opposite in phase there for a diffuse treble, then cut steeply."""
    spec = rfft(dry) * undb(along(OVERALL_TONE, N))
    spec[0] *= np.exp(1j * along(TREBLE_PHASE, N))
    steep_cut = signal.ellip(8, .2, 70, TOP_HZ, fs=SR, output="sos")
    return signal.sosfilt(steep_cut, irfft(spec, N))


dry = scene()
out = record(dry)
wrap_up_sound(out)
```